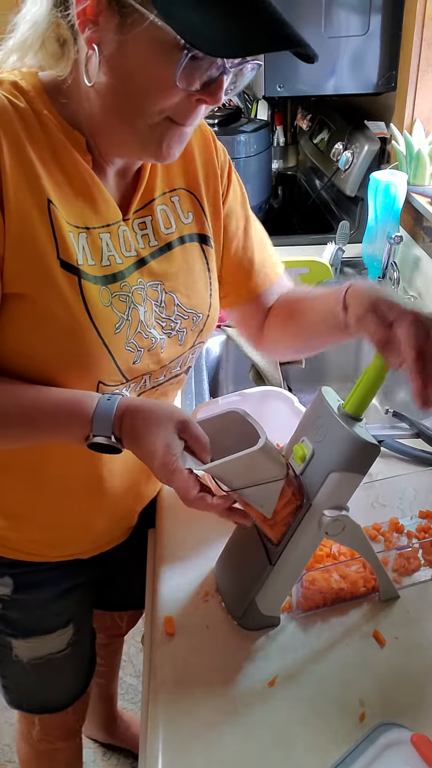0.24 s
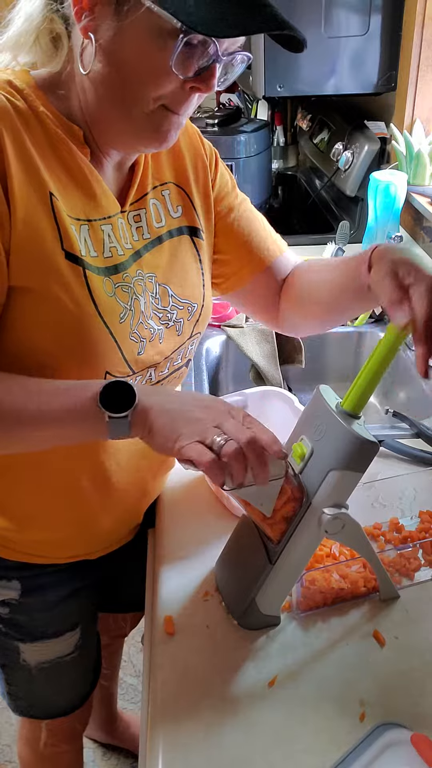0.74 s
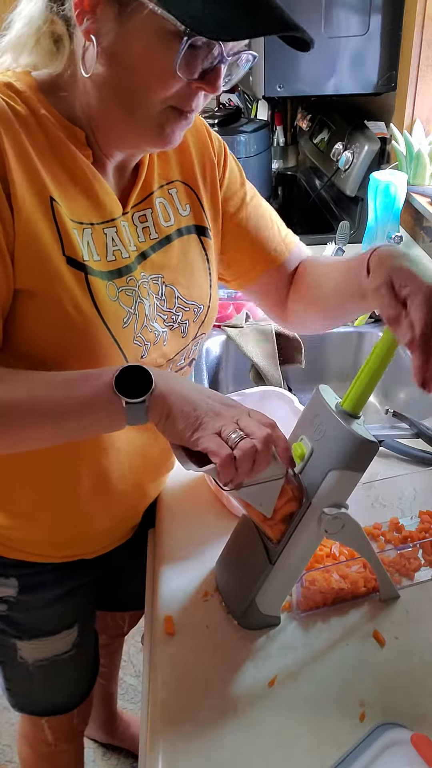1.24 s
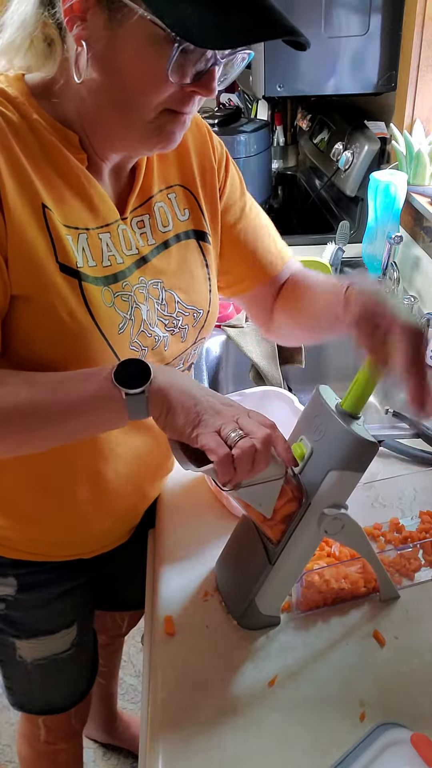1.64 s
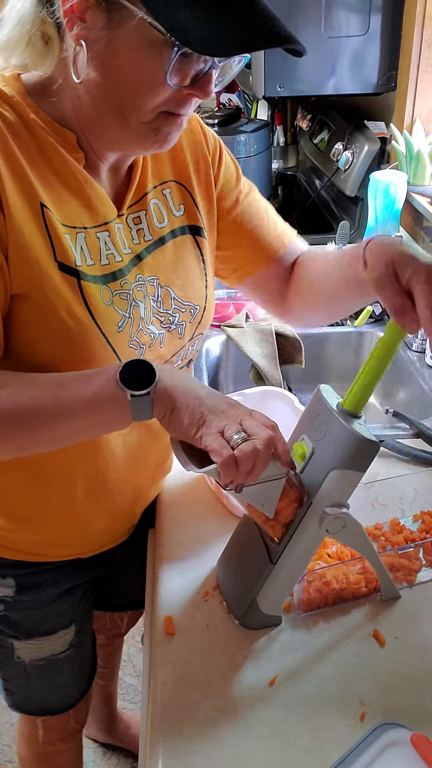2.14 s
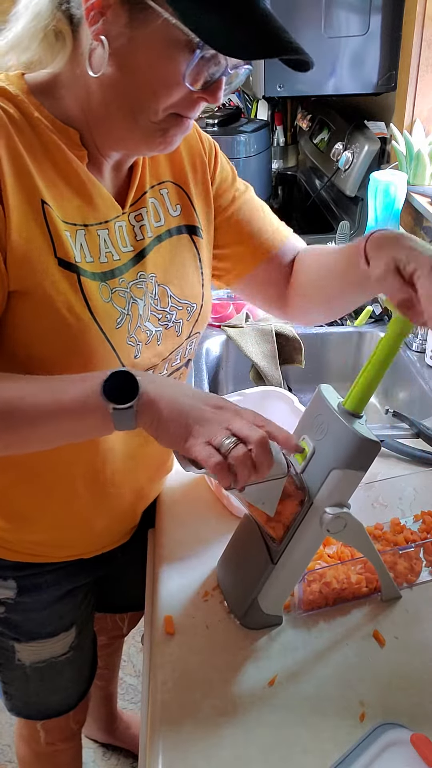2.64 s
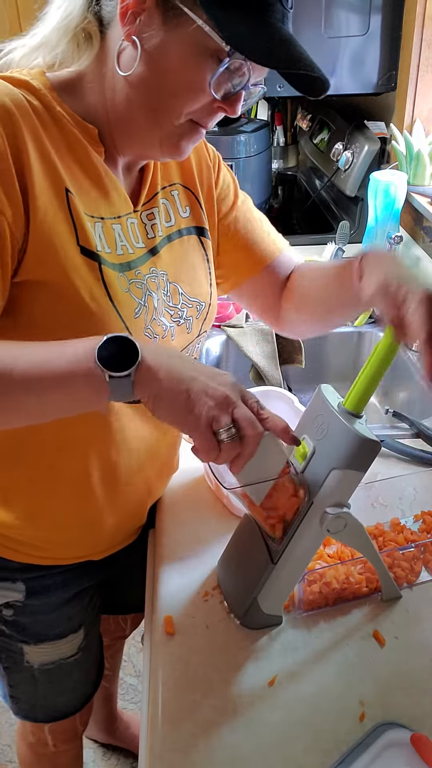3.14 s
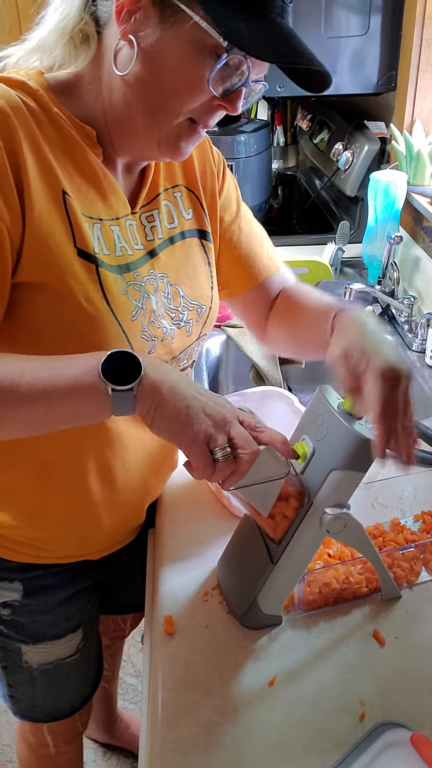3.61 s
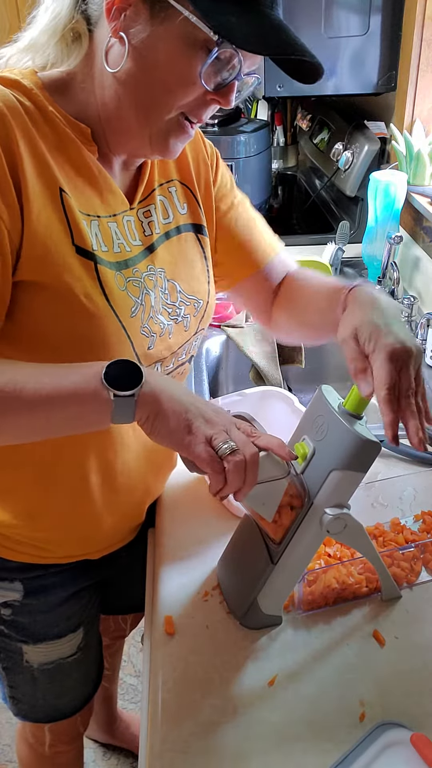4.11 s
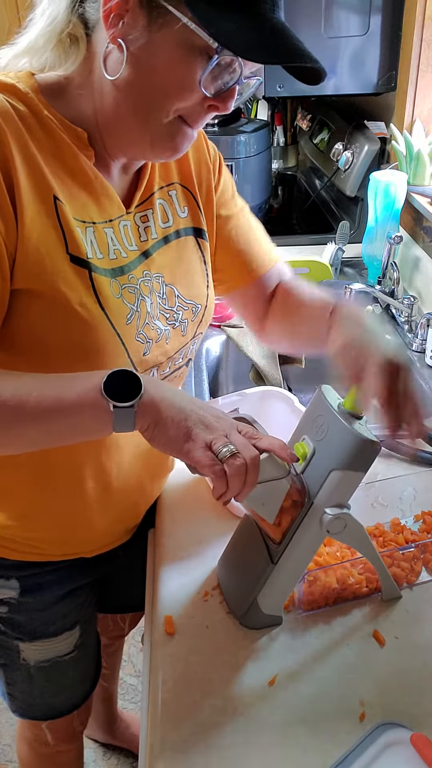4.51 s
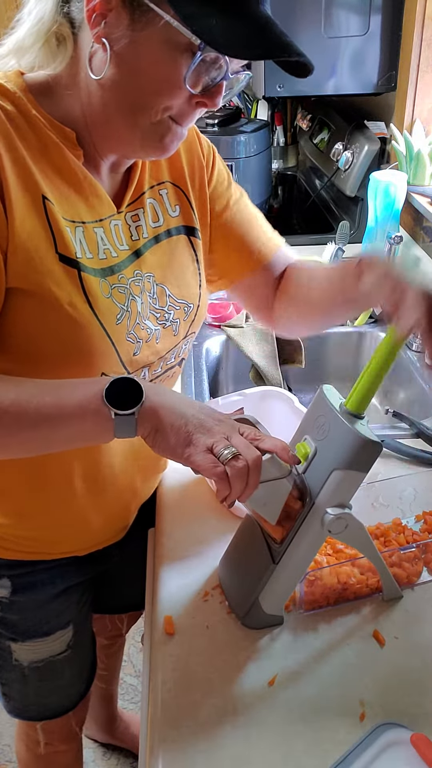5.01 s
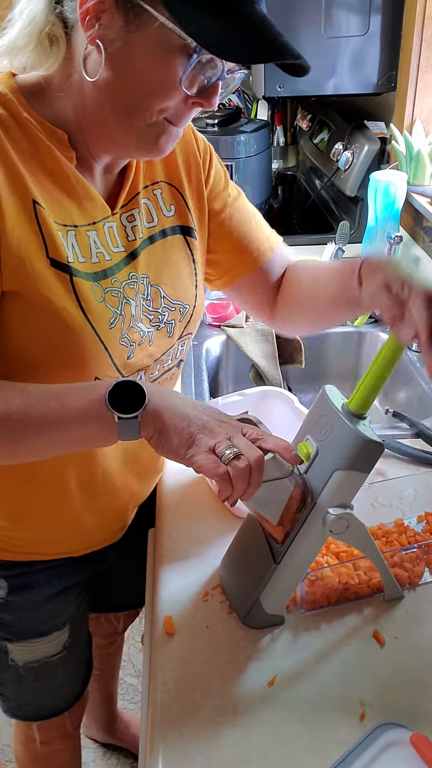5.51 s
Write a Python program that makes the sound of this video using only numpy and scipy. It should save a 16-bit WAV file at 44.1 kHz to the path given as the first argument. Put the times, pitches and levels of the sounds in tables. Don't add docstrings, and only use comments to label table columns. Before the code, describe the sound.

Close up in a small hard kitchen, a plastic plunger slicer is worked about twice a second. Each push hisses and crunches wetly through carrot, sometimes ending in a dull hollow thud; each spring return slides back to a hard plastic clack. Little knocks and snaps fill the gaps, the counter booms low, and a faint house hum sits beneath. Stereo phone microphones, slightly stronger on the right.

```python
import sys
import numpy as np
from scipy import signal
from scipy.fft import rfft, irfft, next_fast_len
from scipy.io import wavfile
from scipy.ndimage import map_coordinates

SR = 44100
rng = np.random.default_rng(int(sys.argv[2]) if len(sys.argv) > 2 else 0)


def linear_from_db(decibels):
    return 10 ** (np.asarray(decibels, float) / 20)


def master_out(mix):
    frames = np.transpose(np.atleast_2d(mix))
    ceiling = np.clip(frames, -1, 1)
    pcm = np.round(ceiling * 32767).astype(np.int16)
    wavfile.write(sys.argv[1], SR, pcm)


N = 254016

# (time [s], peak [dB], hopper [dB], brightness [dB], rattle length [s])
TOP_STOPS = [
    (0.117, -10.5, -11, -3.5, 0.0029),
    (0.726, -18, -15, -12, 0.0089),
    (1.674, -4, -19.5, -16.5, 0.0084),
    (2.135, -3.5, -11.5, -10.5, 0.0017),
    (2.612, -3, -18, -15, 0.0043),
    (3.168, -7.5, -23.5, -13, 0.0056),
    (3.73, -10, -19.5, -6.5, 0.0053),
    (4.604, -9, -9, -9, 0.0041),
    (5.025, -14.5, -14.5, -9, 0.013),
    (5.467, -19, -3, -4, 0.0062),
]
# (centre [Hz], width [Hz], level [dB])
FRAME_MODES = [(1200, 24, 4.5), (1698, 350, 6), (2120, 130, 1.5), (2210, 130, -3), (2736, 300, 2),
               (3215, 720, -1), (4420, 540, -32.5), (5120, 290, -11.5)]
# (centre [Hz], width [Hz], level [dB])
HOPPER_MODES = [(680.3, 64, 13), (576, 50, -28), (824, 65, -2.5)]
# (frequency [Hz], left minus right [dB])
LEFT_DB = [(60, -.6), (180, -4), (400, -1.4), (1500, -1.8), (5000, -3), (14000, -4.4)]


def unit(x):
    return x / np.sqrt(np.mean(x ** 2) + 1e-20)


def along(points, hz):
    f, v = np.transpose(points)
    return np.interp(np.log(hz + 1), np.log(f + 1), v)


def filtered(x, response):
    m = 2 * next_fast_len(N // 2 + SR // 4)
    hz = np.fft.rfftfreq(m, 1 / SR)
    return irfft(rfft(x, m) * response(hz), m)[..., :N]


def coloured(x, spectrum):
    return unit(filtered(x, lambda hz: linear_from_db(along(spectrum, hz))))


def resonant(x, modes):
    def response(f):
        body = 0
        for k, (centre, width, db) in enumerate(modes):
            damping = 1j * f * width
            body = body + (-1) ** k * linear_from_db(db) * damping / (centre * centre - f * f + damping + 1e-9)
        return body / np.sqrt(np.mean(np.abs(body) ** 2))
    return filtered(x, response)


def wobble(knots_per_s):
    knots = rng.standard_normal(int(N * knots_per_s / SR) + 4)
    fine = map_coordinates(knots, [np.arange(0, N + 8, 8) * knots_per_s / SR])
    return np.interp(np.arange(N) / 8, np.arange(len(fine)), fine)


def grit(spread_db):
    return unit(rng.standard_normal(N) * linear_from_db(spread_db * wobble(900)))


def house():
    # (frequency [Hz], level [dB per Hz])
    spectrum = [(18, -13), (30, 7), (76, -11), (519, -13), (694, -20.5), (1150, -23.5), (1660, -31.5),
                (2470, -75), (16500, -49.5)]
    noise = rng.standard_normal((2, N)) + 0.55 * rng.standard_normal(N)
    return linear_from_db(-56) * coloured(noise, spectrum)


def kitchen(x):
    # (frequency [Hz], t60 [s])
    decay = [(150, 0.088), (700, 0.32), (2000, 0.21), (6000, 0.23), (14000, 0.14)]
    wet, step = np.zeros((2, N + SR)), SR // 4
    for start in range(0, N, step):
        hz, t, z = signal.stft(rng.standard_normal((2, SR // 2)), SR, nperseg=256)
        dying = z * linear_from_db(-60 * t / along(decay, hz)[:, None])
        tail = signal.istft(dying, SR, nperseg=256)[1]
        piece = signal.fftconvolve(x[None, start:start + step], tail / np.linalg.norm(tail[0]), axes=1)
        wet[:, start + 120:][:, :piece.shape[1]] += piece
    return wet[:, :N]


def ports(x, lasts_s, lag_s, near_db, near_hz, even):
    near_t60_s, lag_fades_hz = 0.016, 1740
    step, t = round(lasts_s * SR), np.arange(round(near_t60_s * SR)) / SR
    padded, out = np.pad(x, (step, 2 * step)), np.zeros((2, N + 4 * step + len(t)))
    high = signal.butter(1, near_hz, "high", fs=SR)
    for start in range(0, N + step, step):
        near = signal.lfilter(*high, rng.standard_normal((2, len(t))) * linear_from_db(-60 * t / near_t60_s))
        near = linear_from_db(near_db) * near / np.linalg.norm(near[0])
        near[:, 0] = 1
        spectrum = rfft(near)
        near = irfft(spectrum / np.abs(spectrum) ** even, len(t))
        faded = padded[start:][:2 * step] * np.hanning(2 * step)
        piece = signal.fftconvolve(faded[None], near, axes=1)
        out[:, start:][:, :piece.shape[1]] += piece / np.linalg.norm(near[0])
    side = np.array([[0.5], [-0.5]])

    def balance(hz):
        delay_s = side * lag_s / (1 + (hz / lag_fades_hz) ** 2)
        return linear_from_db(side * along(LEFT_DB, hz)) * np.exp(-2j * np.pi * hz * delay_s)
    return filtered(out[:, step:][:, :N], balance)


def travel(rows, rise, start_db, slows_db_per_s, t):
    stop, length, db = np.transpose(rows)[:3, :, None]
    since_full_speed = t - stop + length - rise * length
    early = np.clip(-since_full_speed / (rise * length), 0, 1)
    waking = 499 * np.maximum(stop - length - t, 0)
    dying = 800 * np.maximum(t - stop, 0)
    easing = slows_db_per_s * np.maximum(since_full_speed, 0)
    return db + start_db * early ** 1.43 - easing - waking - dying


def stroke():
    # (stop [s], travel [s], slide [dB], hopper [dB], counter [dB])
    down = [(.265, .13, -55, -15, 0.), (0.893, 0.055, -49.5, -22, 4), (1.4, 0.091, -35, -10, -0.5),
            (1.87, 0.094, -39.5, -7.5, 1), (2.374, 0.096, -44, 8.5, -1.5), (2.91, 0.12, -50, 4.5, -2),
            (3.48, 0.1, -42, -0.5, -8.5), (3.956, 0.082, -46.5, 6.5, 2), (4.38, 0.079, -39, 6, -3.5),
            (4.787, 0.095, -42, 8.5, -5), (5.235, 0.12, -43, -1, 4), (5.688, 0.16, -46.5, 2.5, -0.5)]
    # (stop [s], travel [s], slide [dB], hopper [dB], counter [dB])
    up = [(.115, 0.15, -44, 3.5, 3.5), (0.549, 0.17, -55.5, -8.5, -19), (.73, 0.12, -56.5, 8, -1),
          (1.259, 0.12, -60.5, -4, 4.5), (1.673, 0.1, -46, -0.5, 0.), (1.965, 0.036, -61, 18.5, 5),
          (2.136, 0.11, -45, -5.5, -6.5), (2.425, 0.017, -67.5, 0, -10.5), (2.611, 0.087, -48, 5, -12),
          (3.168, 0.1, -52.5, -0.5, -11.5), (3.37, 0.11, -56.5, 0., -2), (3.729, 0.14, -46.5, 4.5, -4),
          (4.243, .1, -54.5, 8.5, -2.5), (4.604, 0.12, -45, -0.5, 1.5), (5.025, 0.13, -46.5, -2.5, -3.5),
          (5.463, 0.14, -46, 3, -5)]
    # (frequency [Hz], level [dB per Hz])
    crunch_spectrum = [(150, -20), (250, -2), (548, -9), (687, -3.5), (1040, -6.5), (1550, -4.5),
                       (1810, -10), (2240, -5), (3300, -15), (6000, -39), (7800, -59), (13200, -120)]
    # (frequency [Hz], level [dB per Hz])
    hiss_spectrum = [(2350, -6), (4000, -3.5), (5350, -6.5), (6780, -10), (9340, -6.5), (14400, -10.5),
                     (16000, -14.5), (16500, -44.5)]
    # (frequency [Hz], level [dB per Hz])
    rumble_spectrum = [(15, -47), (25, -15), (38, -14), (59, 6.5), (92, 7.5), (135, -8), (177, -7.5),
                       (208, -7.5), (250, -19.5), (320, -81), (550, -120)]
    brisk_db = -45
    t, top = np.arange(0, N / SR + 0.002, 0.001), np.array(TOP_STOPS)

    since = t - top[:, :1]
    coast = np.where(since > 0, top[:, 1:2] - 33.5 - 157 * since, -400)
    pushing = travel(down, rise=0.46, start_db=-15.5, slows_db_per_s=12, t=t)
    returning = travel(up, rise=0.56, start_db=-19, slows_db_per_s=68.5, t=t)
    slide_db = np.vstack([pushing, returning, coast]) - brisk_db
    extras = np.vstack([np.vstack([down, up])[:, 3:], np.zeros((len(top), 2))])
    hopper_db, counter_db = extras.T[:, :, None]

    def gain(db):
        return np.interp(np.arange(N) / SR, t, linear_from_db(db).sum(axis=0))

    judder = wobble(30)
    fibres = coloured(grit(3), crunch_spectrum) + 0.4 * unit(resonant(grit(3), FRAME_MODES))
    crunch = gain(-38 + 0.84 * slide_db) * linear_from_db(1.5 * judder + 2 * wobble(120)) * unit(fibres)
    hum = gain(-33.5 + hopper_db + slide_db) * linear_from_db(-10 + 0.5 * judder + 2.6 * wobble(22.18))
    hum = hum * unit(resonant(grit(2.6), HOPPER_MODES))
    hiss = gain(brisk_db + slide_db) * linear_from_db(3 + 1.2 * judder) * coloured(grit(4.3), hiss_spectrum)
    shake = gain(-36 + counter_db + 0.5 * slide_db) + linear_from_db(-56)
    return crunch + hum + hiss, shake * coloured(rng.standard_normal(N), rumble_spectrum)


def small_blows():
    # (time [s], peak [dB], pitch [Hz], hopper [dB])
    knocks = [(.007, -15, 962, -21.5), (0.308, -33, 930, -41), (0.363, -21, 2060, -27),
              (0.431, -26.5, 890, -7.5), (0.496, -24.5, 850, -24), (.68, -27, 1200, -18),
              (1.034, -59.5, 966, -5), (1.1, -52, 930, -7), (1.156, -32, 945, -17),
              (1.574, -20.5, 1016, -9.5), (2.534, -29, 2300, -24.5), (2.566, -31, 940, -9.5),
              (2.946, -31, 896, -12), (3.293, -18, 965, -38.5), (3.318, -27.5, 1650, -13),
              (4.029, -41.5, 1300, -1.5), (4.706, -36, 925, 5), (4.912, -27, 860, -6.5)]
    # (time [s], peak [dB], pitch [Hz], counter [dB])
    snaps = [(0.056, -27, 1232, -10), (.243, -30, 1680, 5.5), (.66, -35, 1430, -2.5),
             (0.854, -33, 2400, -29), (1.197, -29.5, 974, -1), (1.952, -24, 1464, -31),
             (2.071, -28.5, 1990, -26), (2.395, -29.5, 1195, -7.5), (3.128, -37, 1500, -9),
             (3.404, -24.5, 1440, -16), (3.662, -29, 2300, -22), (4.163, -36, 960, -10),
             (4.314, -29.5, 815, -16), (4.536, -24.5, 2240, -23)]
    # (time [s], peak [dB], pitch [Hz], hopper [dB])
    drops = [
        (0.376, -20.5, 3040, -14),
        (1.312, -22.5, 2350, -26),
        (3.687, -29, 1080, -17),
        (5.153, -24.5, 1308, -1),
        (5.163, -17, 1210, -7),
        (5.174, -3.5, 1250, -21),
    ]
    rows = [(s, db, hop, -42, hz, -15.5) for s, db, hz, hop in knocks]
    rows += [(s, db, -17.5, -10.5, hz, low) for s, db, hz, low in snaps]
    rows += [(s, db, hop, -31, hz, -26) for s, db, hz, hop in drops]
    return np.array(rows)


def pieces(e, level_db, cycles):
    out, t = np.zeros(N + SR), np.arange(SR // 10) / SR
    for s, db, hz in e[:, [0, 1, 4]]:
        shake = rng.standard_normal(len(t)) * linear_from_db(-60 * t / 0.04)
        tones = np.sin(2 * np.pi * hz * t) + 0.8 * np.sin(2 * np.pi * 1.22 * hz * t)
        ring = signal.fftconvolve(shake, linear_from_db(-60 * t * hz / cycles) * tones)[:len(t)]
        out[round(s * SR):][:len(t)] += linear_from_db(db + level_db) * ring / np.abs(ring).max()
    return out[:N]


def swing(times, level_db, rises, modes):
    out, t = np.zeros(N + SR), np.arange(SR // 2) / SR
    for s, db, rise in np.broadcast(times, level_db, rises):
        ring = 0
        for hz, level, t60 in modes:
            ring = ring + linear_from_db(level + rng.normal(0, 1.32) - 60 * t / t60) * np.sin(2 * np.pi * hz * t)
        out[round(s * SR):][:len(t)] += linear_from_db(db) * ring * (1 - np.exp(-t / rise))
    return out[:N]


def rattle(times, lengths, level_db, rise_s, fall_s):
    shape, t = np.zeros(N + SR), np.arange(SR // 4) / SR
    for s, length, db in np.broadcast(times, lengths, level_db):
        fall = linear_from_db(-60 * np.maximum(t - length, 0) / fall_s)
        shape[round(s * SR):][:len(t)] += linear_from_db(db) * (1 - np.exp(-t / rise_s)) * fall
    return shape[:N]


def blows(e, lengths, body_db, hopper_db, crack_db, rise_s, fall_s, dull_hz):
    # (frequency [Hz], level [dB per Hz])
    crack_spectrum = [(1760, 4.5), (3000, 1.5), (3610, -3), (4700, -7.5), (4980, -7), (7320, -11),
                      (12100, -12.5), (15600, -19), (16500, -85)]
    s, peak_db, hollow_db, bright_db = e[:, :4].T
    body = resonant(rattle(s, lengths, peak_db + body_db, rise_s, fall_s) * grit(4), FRAME_MODES)
    body = filtered(body, lambda hz: (hz / (hz - 900j)) ** 3 / (1 + 1j * hz / dull_hz) ** 2)
    hollow = rattle(s, lengths, peak_db + hollow_db + hopper_db, rise_s, fall_s)
    hopper = resonant(hollow * grit(6.4), HOPPER_MODES)
    sharp_db = peak_db + bright_db + crack_db
    crack = rattle(s, lengths, sharp_db, rise_s, fall_s=0.028)
    settling = rattle(s, lengths, sharp_db - 27, rise_s, fall_s=0.46)
    return body + hopper + (crack + settling) * coloured(grit(1.7), crack_spectrum)


def stops():
    # (time [s], peak [dB], hopper [dB], brightness [dB], rattle length [s])
    thuds = [
        (1.386, -19.5, -6, -3, 0.009),
        (1.875, -19, -11.5, -8.5, 0.0096),
        (3.467, -25, -3, -11.5, 0.013),
        (4.365, -15.5, 0, -6.5, 0.0037),
        (4.788, -13, -9, -11.5, 0.0047),
        (5.236, -18, -2.5, -14, 0.0064),
    ]
    # (time [s],
    # level [dB], rise [s])
    pushes = [(0.1205, -7, 0.0072), (0.7352, -11, 0.0066), (1.328, -12.5, 0.0092), (1.3859, -6, 0.0019),
              (1.6834, -8.5, 0.024), (1.873, -7, 0.0019), (2.1396, -3.5, 0.029), (2.6238, -6, 0.038),
              (3.176, -11.5, 0.0039), (3.411, -21, 0.0021), (3.4743, -6.5, 0.0053), (3.742, -4, 0.018),
              (4.367, -5.5, 0.0017), (4.61, -7.5, 0.0069), (4.7829, -5, 0.0041), (5.0372, -11, 0.0051),
              (5.2384, -9, 0.00064), (5.4729, -8, 0.0073)]
    # (centre [Hz], width [Hz], level [dB])
    base_modes = [(239, 100, -15.5), (440, 13, -24), (940, 960, -6), (1630, 280, 1), (1990, 75, 2.5),
                  (2165, 350, 2.5), (3140, 580, -7.5)]
    # (centre [Hz], width [Hz], level [dB])
    shudder_modes = [(170, 66, 1), (255, 44, 0), (326.6, 20, -1.5), (378, 70, -7.5), (438, 68, -8)]
    # (frequency [Hz], level [dB], t60 [s])
    counter_modes = [(83.1, 5, 0.13), (51.45, -20, 0.93), (108, -14.5, 0.2)]
    # (frequency [Hz], level [dB], t60 [s])
    feet_modes = [(139, 5.5, 0.12), (158.4, -38, 0.11), (245, -2.5, 0.11)]
    top, bottom, small, push = map(np.array, (TOP_STOPS, thuds, small_blows(), pushes))
    top[:, 0] += 0.001
    bottom[:, 0] += 0.001

    air = blows(top, top[:, 4], body_db=-7, hopper_db=10.5, crack_db=10,
                rise_s=0.0014, fall_s=0.031, dull_hz=6200)
    air += blows(bottom, bottom[:, 4], body_db=-1, hopper_db=8, crack_db=9.5,
                 rise_s=0.0012, fall_s=0.023, dull_hz=5180)
    slam = rattle(bottom[:, 0], bottom[:, 4], bottom[:, 1] - 6, rise_s=0.00025, fall_s=0.11)
    air += resonant(slam * grit(1), base_modes)
    air += blows(small, 0.011, body_db=-12, hopper_db=4, crack_db=4,
                 rise_s=0.0046, fall_s=0.042, dull_hz=3040)
    air += pieces(small, level_db=-4, cycles=30)
    jolt = rattle(top[:, 0], 0.01, -27, rise_s=0.008, fall_s=0.25)
    jolt += rattle(bottom[:, 0], 0.02, -19.5, rise_s=0.004, fall_s=0.3)
    air += resonant(jolt * grit(2.5), shudder_modes)

    boom = swing(*push.T, counter_modes)
    boom += swing(small[:, 0] + 0.0065, small[:, 1] + small[:, 5], 0.0052, counter_modes)
    boom += swing(bottom[:, 0] + 0.002, -22, 0.001, feet_modes)
    return air, boom


def scene():
    hits, booms = stops()
    rub, rumble = stroke()
    air = ports(hits, lasts_s=0.09, lag_s=0.00024, near_db=4, near_hz=1500, even=0.48)
    air += ports(rub, lasts_s=0.04, lag_s=0.0002, near_db=4.5, near_hz=1500, even=0.92)
    side = np.array([[0.5], [-0.5]])
    counter = filtered(booms + rumble, lambda hz: linear_from_db(side * along(LEFT_DB, hz)))
    room = linear_from_db(-9) * kitchen(hits) + linear_from_db(-6.5) * kitchen(rub + linear_from_db(-9.5) * booms)
    return air + room + counter + house()


def roll_off(x):
    return signal.sosfilt(signal.butter(12, 16820, fs=SR, output="sos"), x)


def record(dry):
    thin = filtered(dry, lambda hz: 1 / np.sqrt(1 + (43 / (hz + 1)) ** 14))
    held = thin / (1 + np.abs(thin) ** 6) ** (1 / 6)
    mix = filtered(held, lambda hz: 1 / (1 + (hz / 16000) ** 80))
    return roll_off(mix)


dry = scene()
out = record(dry)
master_out(out)
```